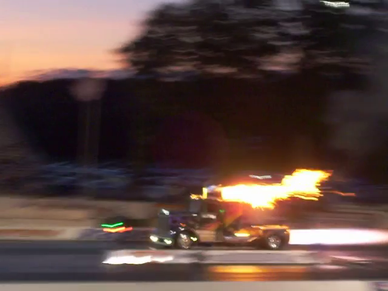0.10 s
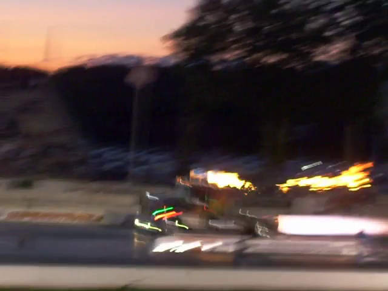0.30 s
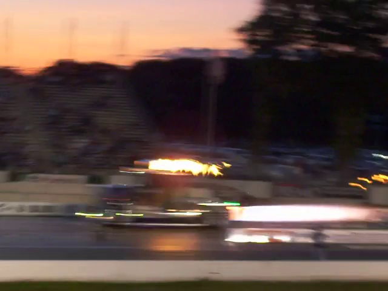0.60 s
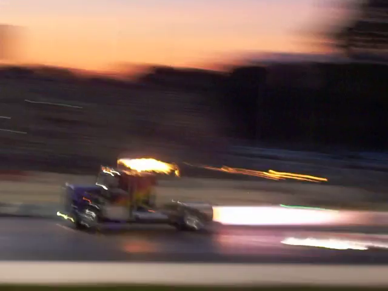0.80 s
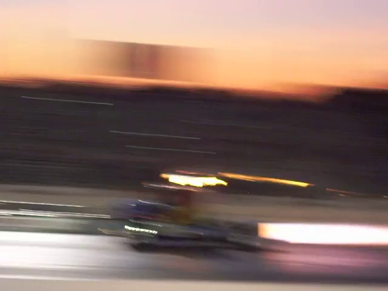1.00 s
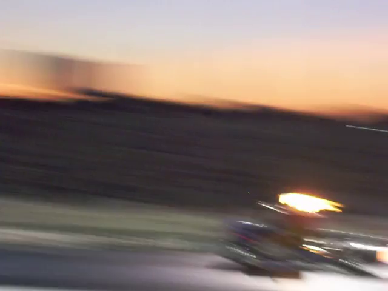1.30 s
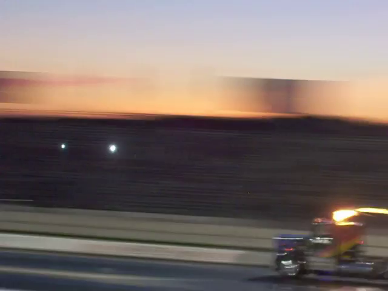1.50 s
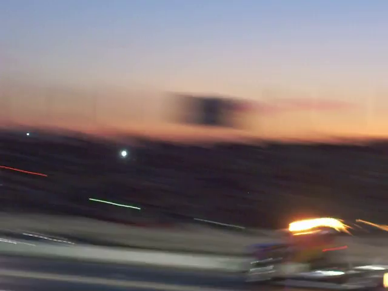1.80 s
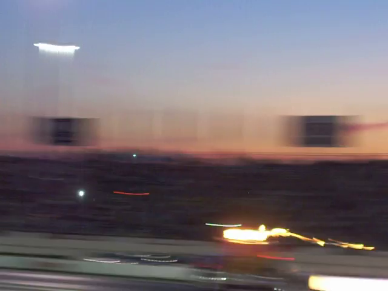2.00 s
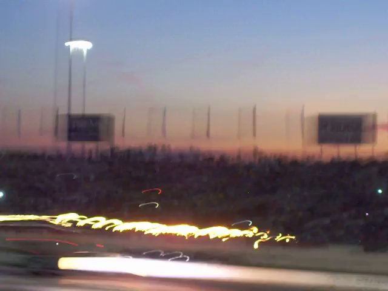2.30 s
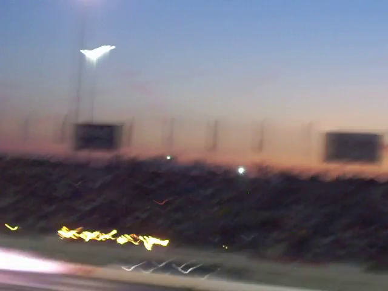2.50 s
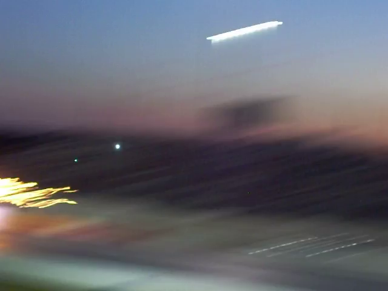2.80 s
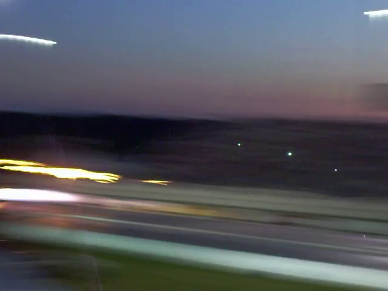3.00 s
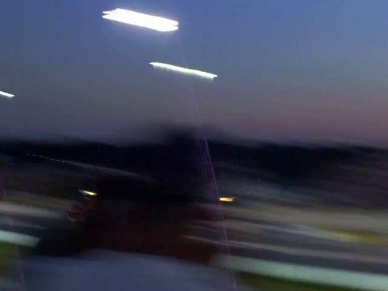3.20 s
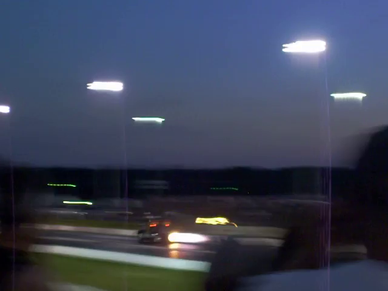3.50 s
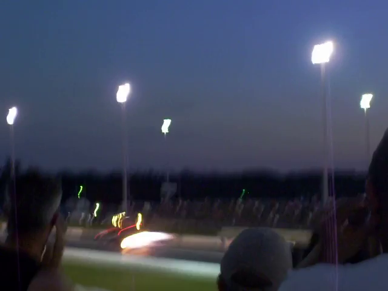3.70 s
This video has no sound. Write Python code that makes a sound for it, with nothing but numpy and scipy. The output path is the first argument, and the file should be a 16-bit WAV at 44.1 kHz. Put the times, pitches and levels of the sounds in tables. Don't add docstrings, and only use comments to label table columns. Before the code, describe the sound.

A jet-powered truck roars down an outdoor drag strip, distorting a small camera microphone with sharp clipping clicks at first; the roar turns hollow and fluttery, then fades to a rumble.

```python
import sys
import numpy as np
from scipy import signal
from scipy.fft import rfft, irfft
from scipy.io import wavfile
from scipy.ndimage import uniform_filter1d

SR = 44100
rng = np.random.default_rng(int(sys.argv[2]) if len(sys.argv) > 2 else 0)


def dump(signal):
    limited = np.clip(np.atleast_2d(signal).T, -1, 1)
    pcm = np.round(limited * 32767).astype(np.int16)
    wavfile.write(sys.argv[1], SR, pcm)


def volts_from_decibels(level):
    exponent = np.asarray(level, float) / 20
    return 10 ** exponent


N = 171108

# (time [s], overall level [dB], plume rumble [dB], deepest eddies [dB], ground echo [dB])
PASS_LEVELS = [(0, -13.5, -6.5, -15, -16.5), (.15, -12.5, -10.5, -14, -11), (.4, -13, -16, -30, -12.5),
               (.68, -14, -9.5, -31.5, -21.5), (.76, -14, -9, -15, -9.5), (.85, -15, -17, -22.5, -19.5),
               (1.3, -16, -11, -23, -9), (1.7, -16, -15.5, -27, -11), (2, -16.5, -19, -26, -2.5),
               (2.35, -15.5, -9, -23.5, -1), (2.7, -14.5, -7, -24, -5), (3, -15, 1, -15.5, -4.5),
               (3.25, -16.5, -5, -13, -5.5), (3.55, -19, 1, -7, -2.5), (3.88, -22.5, -3.5, -4.5, -5)]
# (frequency [Hz], level [dB per Hz])
DEEP_SPECTRUM = [(20, -8.5), (40, 2.5), (80, -2.5), (130, -14.5)]
# (frequency [Hz], level [dB per Hz])
PLUME_SPECTRUM = [(50, -13.5), (90, -6), (150, -5), (250, -6.5), (500, -27.5)]
# (frequency [Hz], level [dB per Hz])
JET_SPECTRUM = [(25, -9), (100, -3), (300, 0), (700, 0), (1500, -0.5), (2600, -1.5), (3900, 0.5)]
# (frequency [Hz], level [dB per Hz])
HISS_END = (5000, -12)
# (time [s], strength, sets how far past full scale [dB])
SHOCKS = [(.031, -29), (.0475, -39), (.0602, -37), (.07, -38), (.1248, -30), (.1426, -46), (.267, -53),
          (.2685, -33), (.331, -55), (.3332, -26), (.4234, -32), (.43, -40), (.5862, -30), (.7389, -35),
          (2.8336, -52), (2.8506, -38)]
SHOCK_SHAPE = [-.1, .26, .62, .26, -.1]
# (time [s], travel [times the rms of the roar])
HEADROOM = [
    (0, .3),
    (.6, .35),
    (1.1, .6),
    (1.8, .65),
    (2.2, .3),
    (2.8, .03),
    (3.2, .05),
    (3.5, .3),
    (3.88, .5),
]

SLOW_RATE = 8000
UP, DOWN = 441, 80
BAND_HZ, BAND_BETA = 4000, 9
FULL_SCALE = 0.707


def in_time(rows):
    times, *columns = np.transpose(rows)
    return [np.interp(np.arange(N) / SR, times, column) for column in columns]


def rms_one(x):
    return x / np.sqrt(np.mean(x ** 2) + 1e-20)


def drift(per_s):
    r = np.exp(-2 * np.pi * per_s * 40 / SR)
    steps = rng.standard_normal(N // 40 + 2002)
    slow = signal.lfilter([1], [1, -2 * r, r * r], steps)[2000:]
    return np.interp(np.arange(N) / 40, np.arange(len(slow)), rms_one(slow))


def eddies(spectrum, patchy_db):
    white = rfft(rng.standard_normal(N))
    hz = np.arange(N // 2 + 1) * SR / N + 0.11
    point_hz, point_db = np.transpose(spectrum)
    level_db = np.interp(np.log(hz), np.log(point_hz), point_db, left=-30, right=-60)
    shaped = white * volts_from_decibels(level_db)
    octave = np.log2(hz / 20)
    out = 0
    for center in np.arange(0, 9, 0.5):
        share = np.clip(1 - np.abs(octave - center) / 0.5, 0, 1)
        out = out + irfft(shaped * share, N) * volts_from_decibels(patchy_db * drift(6))
    return rms_one(out)


def plume_rumble(rumble_db, deep_db):
    large = volts_from_decibels(rumble_db) * eddies(PLUME_SPECTRUM, patchy_db=-0.05)
    slowest = volts_from_decibels(deep_db) * eddies(DEEP_SPECTRUM, patchy_db=-0.2)
    return large + slowest


def ground_echo(echo_db):
    center_hz, width_hz = 574, 440
    r = np.exp(-np.pi * width_hz / SR)
    poles = [1, -2 * r * np.cos(2 * np.pi * center_hz / SR), r * r]
    once = signal.lfilter([1, 0, -1], poles, rng.standard_normal(N))
    twice = signal.lfilter([1, 0, -1], poles, once)
    return volts_from_decibels(0.5 + echo_db) * rms_one(twice)


def jet_hiss(away_s):
    gust_db, gusts_per_s = 0.3, 25
    dull_hz, dulling_db_per_s = 1200, -0.5
    gusts = volts_from_decibels(2.5 + gust_db * drift(gusts_per_s))
    jet = gusts * eddies(JET_SPECTRUM + [HISS_END], patchy_db=0.22)
    body = signal.lfilter(*signal.butter(1, dull_hz, fs=SR), jet)
    return body + (jet - body) * volts_from_decibels(dulling_db_per_s * away_s)


def roar():
    level_db, rumble_db, deep_db, echo_db = in_time(PASS_LEVELS)
    away_s = np.maximum(np.arange(N) / SR - 1.76, 0)
    flutter_db_per_s, flutters_per_s = 1.3, 70
    plume = plume_rumble(rumble_db, deep_db)
    near = jet_hiss(away_s) + ground_echo(echo_db)
    flutter = volts_from_decibels(flutter_db_per_s * away_s * drift(flutters_per_s))
    return volts_from_decibels(level_db) * (near * flutter + plume)


def scene():
    return roar()[None]


def bottom_out(x):
    rms = np.sqrt(uniform_filter1d(x ** 2, size=13001))
    return np.minimum(x, in_time(HEADROOM)[0] * rms)


def block_steady_pressure(x):
    high_pass = signal.butter(1, 4, "high", fs=SR, output="sos")
    led_in = np.hstack([x[::-1], x])
    settle_s = 0.9
    offset = -0.022 * np.exp(-np.arange(N) / SR / settle_s)
    return signal.sosfilt(high_pass, led_in)[N:] + offset


def shock_index(s):
    return round(s * SR * DOWN / UP)


def narrow_band(x):
    slow = signal.resample_poly(x, DOWN, UP, window=("kaiser", 3))
    trough, softness = 0.46, 0.13
    over = np.minimum(slow + trough, 0)
    slow = slow - over + softness * np.tanh(over / softness)
    for s, _ in SHOCKS:
        at = shock_index(s)
        slow[at - 2:at + 3] = -np.array(SHOCK_SHAPE)
    smooth = signal.firwin(32 * UP + 1, BAND_HZ, window=("kaiser", BAND_BETA), fs=SR * DOWN)
    return signal.resample_poly(slow, UP, DOWN, window=smooth)[:N]


def crackle(x):
    safe_depth = 0.67
    pulse = signal.firwin(177, BAND_HZ, window=("kaiser", BAND_BETA), fs=SR)
    pulse = pulse / pulse.max()
    ordinary = signal.find_peaks(-x[:-89], height=safe_depth)[0]
    troughs = [(at, safe_depth) for at in ordinary if at > 88]
    for s, peak_db in SHOCKS:
        at = round(shock_index(s) * UP / DOWN)
        troughs.append((at, FULL_SCALE + volts_from_decibels(1.02 * peak_db + 10)))
    out = x.copy()
    for at, depth in troughs:
        out[at - 88:at + 89] -= (depth + out[at]) * pulse
    return out


def band_limit(x):
    return signal.sosfilt(signal.butter(12, 15850, fs=SR, output="sos"), x)


def record(dry):
    x = block_steady_pressure(bottom_out(dry[0]))
    x = narrow_band(np.append(x, np.zeros(20)))
    mix = np.maximum(crackle(x), -FULL_SCALE)[None]
    return band_limit(mix)


dry = scene()
out = record(dry)
dump(out)
```